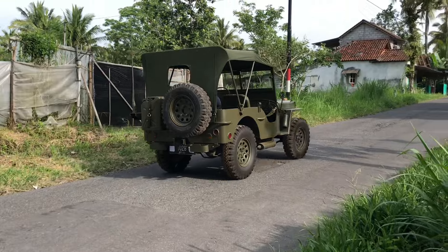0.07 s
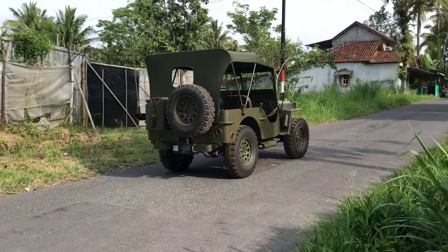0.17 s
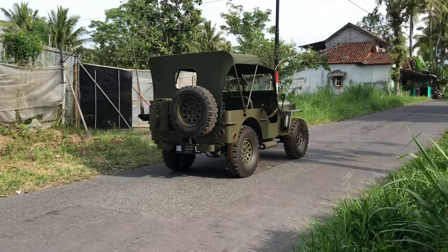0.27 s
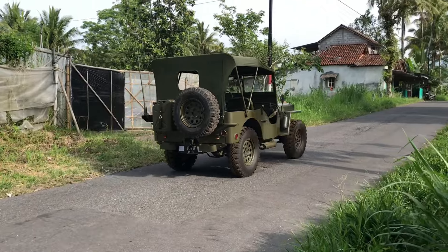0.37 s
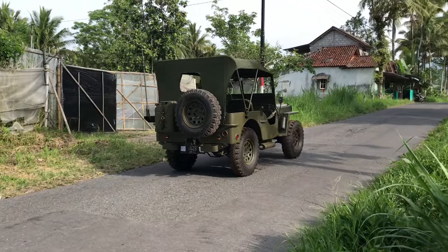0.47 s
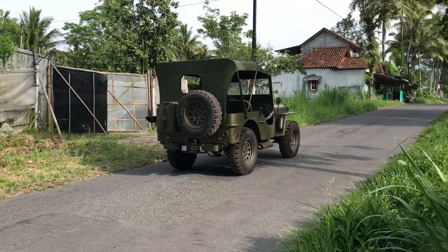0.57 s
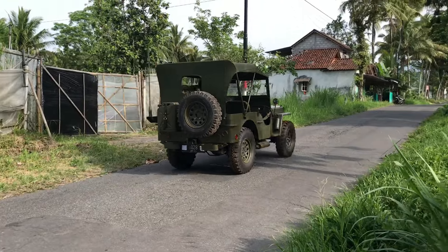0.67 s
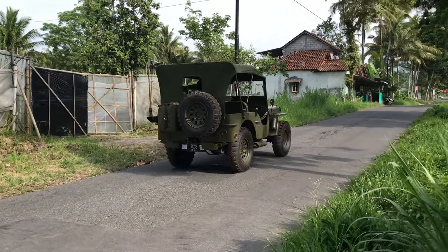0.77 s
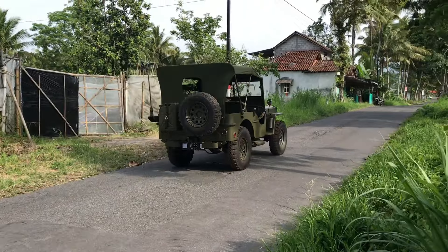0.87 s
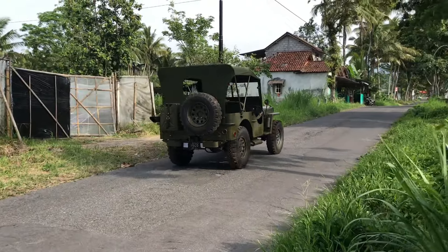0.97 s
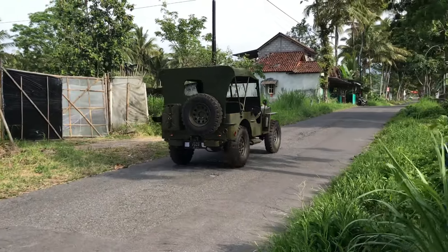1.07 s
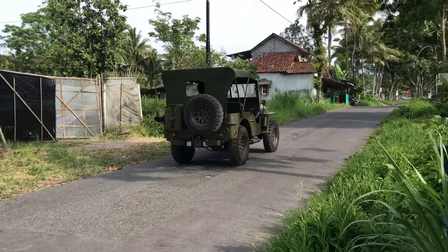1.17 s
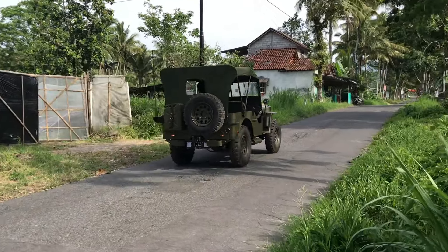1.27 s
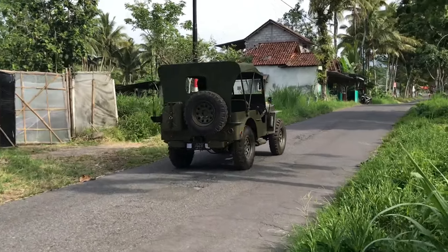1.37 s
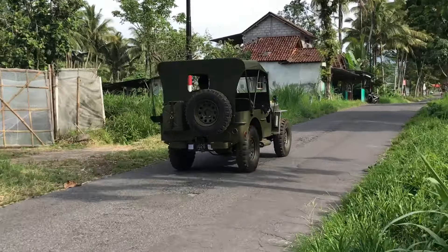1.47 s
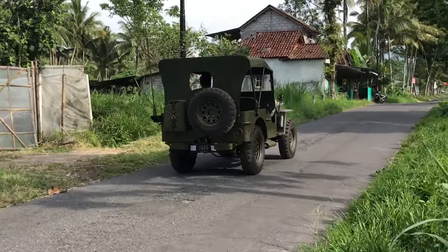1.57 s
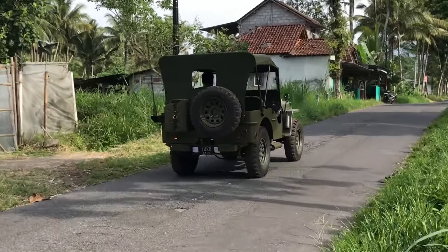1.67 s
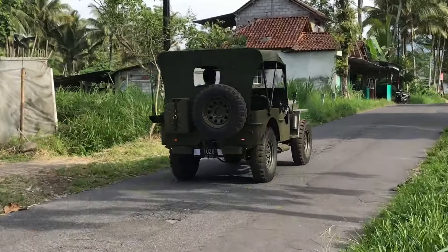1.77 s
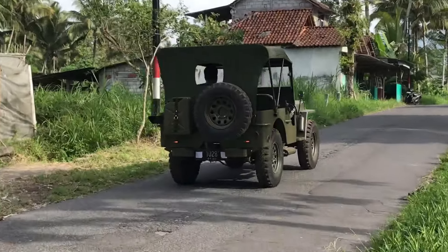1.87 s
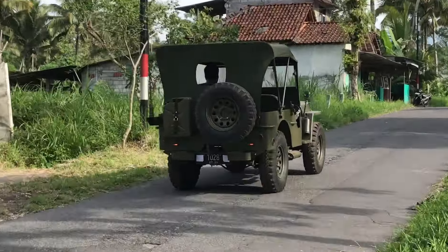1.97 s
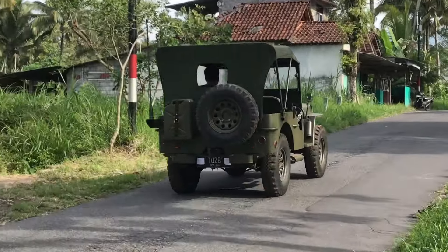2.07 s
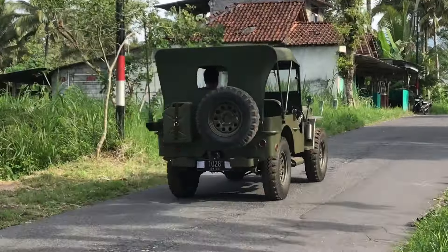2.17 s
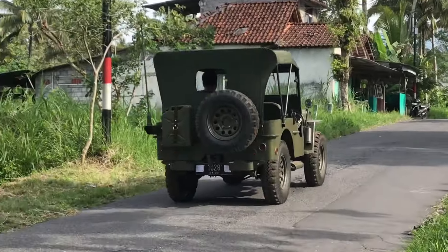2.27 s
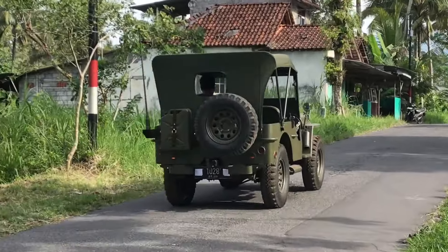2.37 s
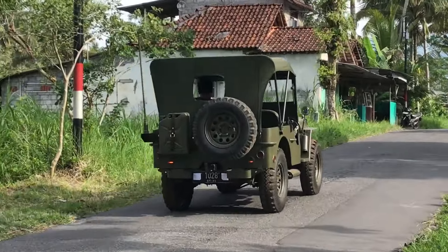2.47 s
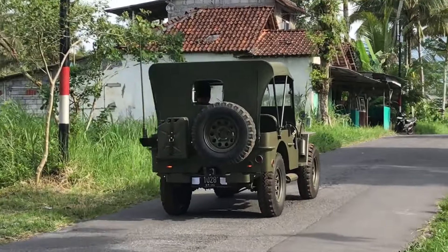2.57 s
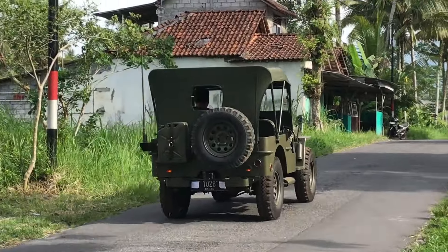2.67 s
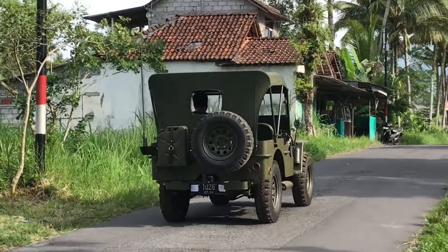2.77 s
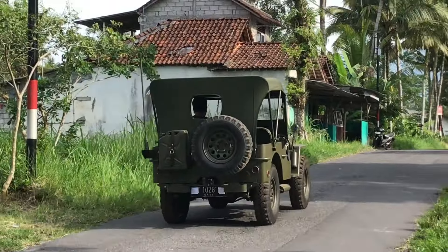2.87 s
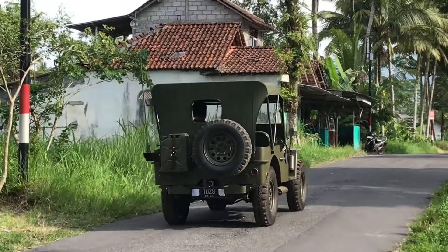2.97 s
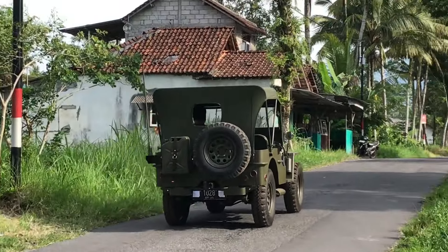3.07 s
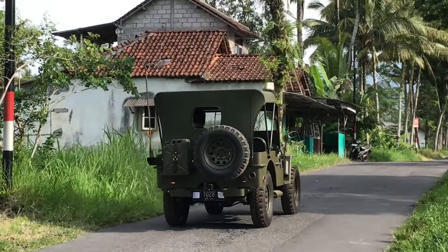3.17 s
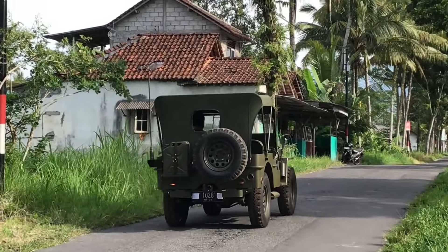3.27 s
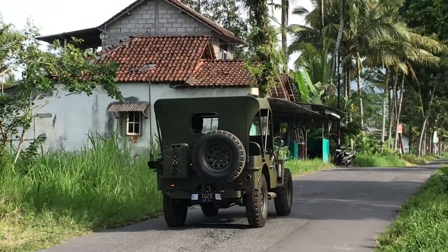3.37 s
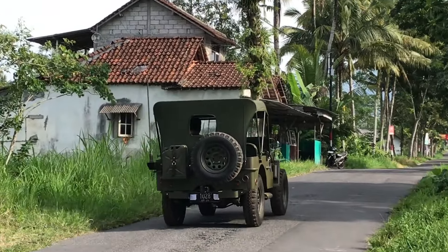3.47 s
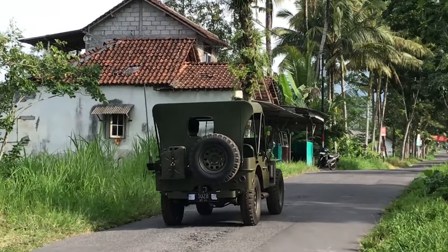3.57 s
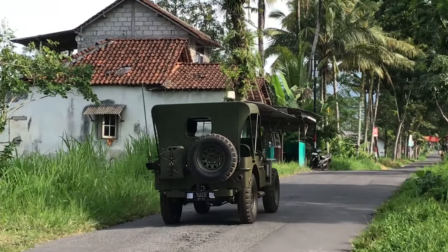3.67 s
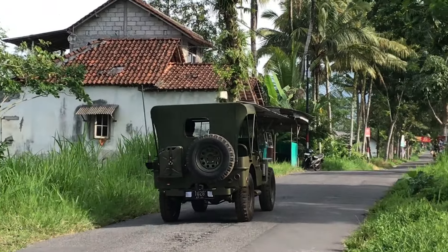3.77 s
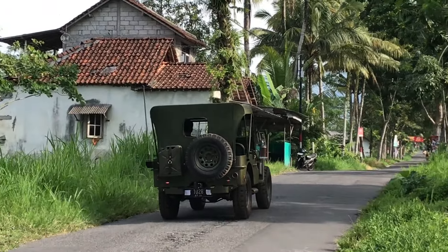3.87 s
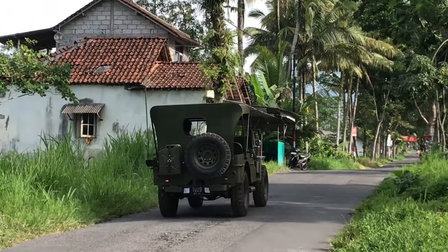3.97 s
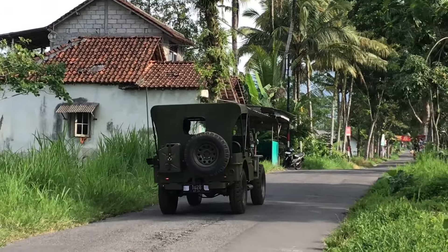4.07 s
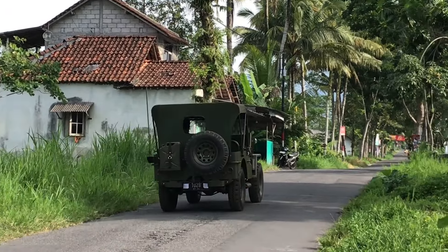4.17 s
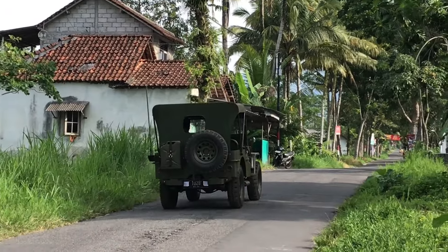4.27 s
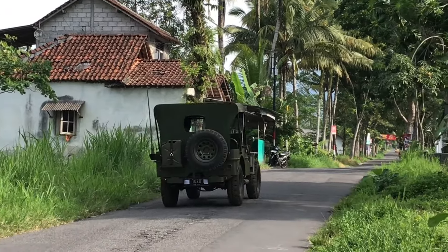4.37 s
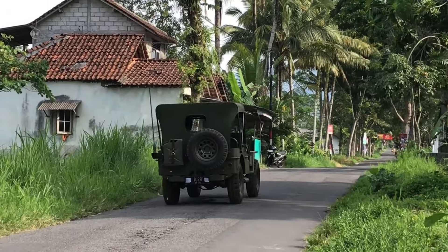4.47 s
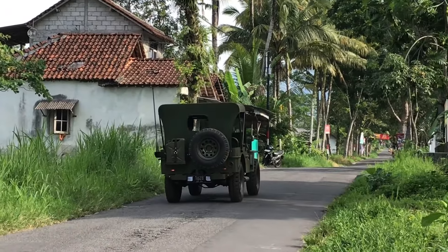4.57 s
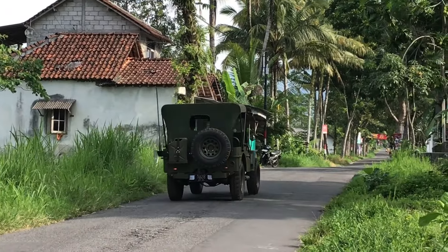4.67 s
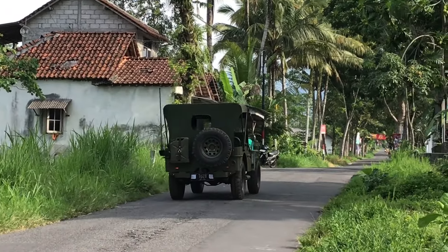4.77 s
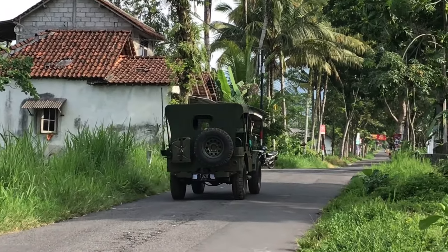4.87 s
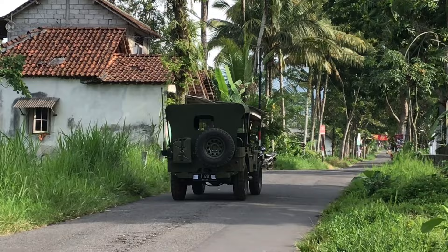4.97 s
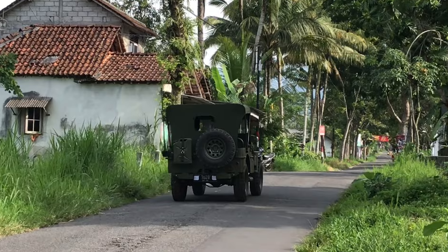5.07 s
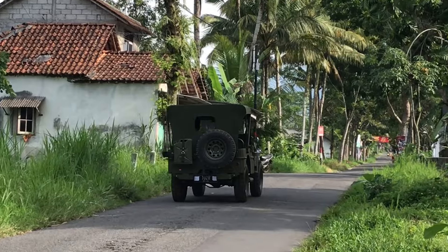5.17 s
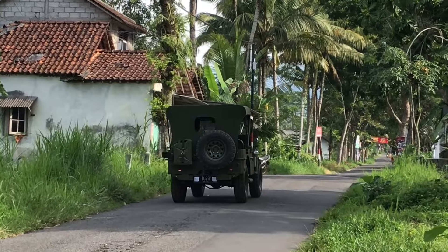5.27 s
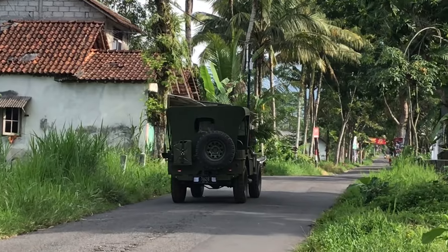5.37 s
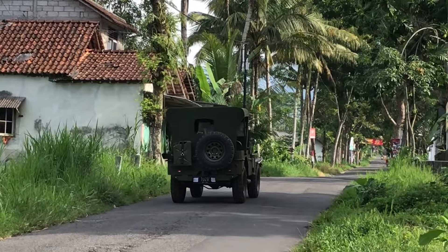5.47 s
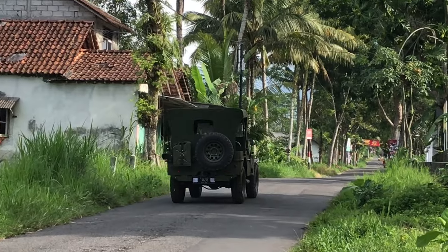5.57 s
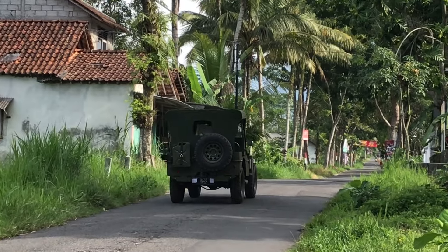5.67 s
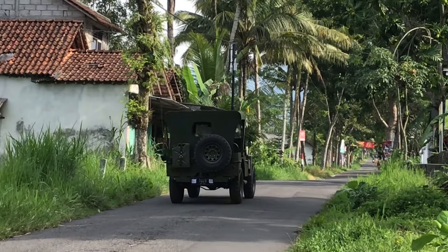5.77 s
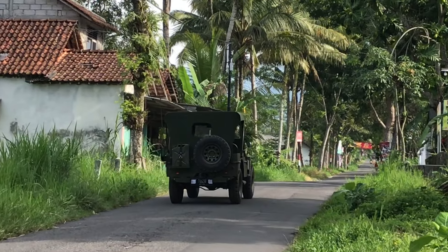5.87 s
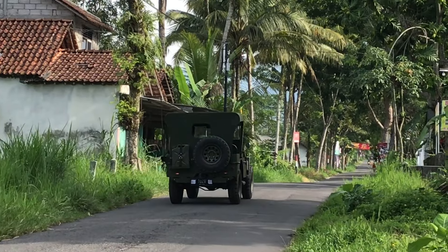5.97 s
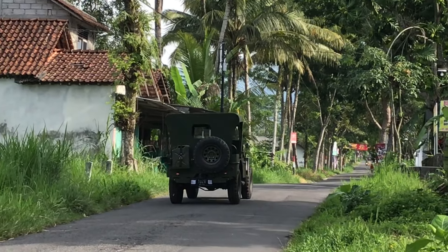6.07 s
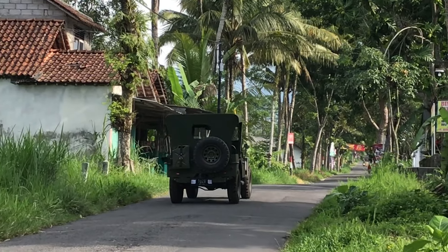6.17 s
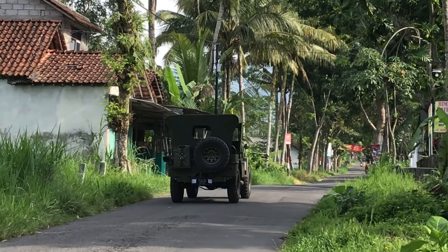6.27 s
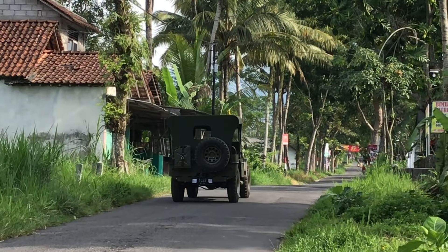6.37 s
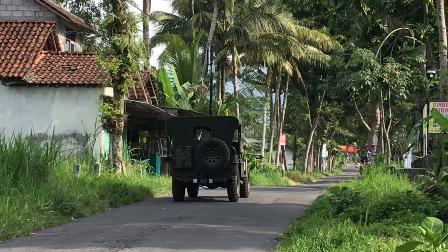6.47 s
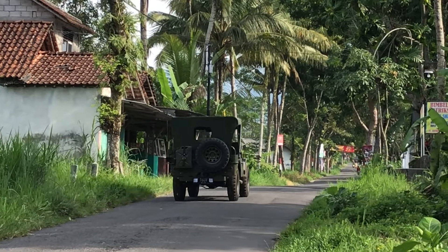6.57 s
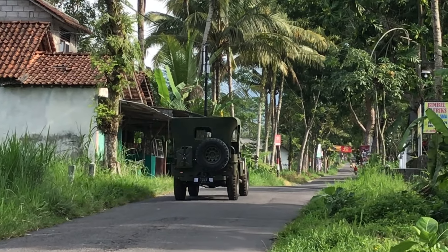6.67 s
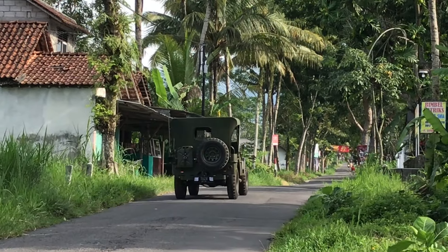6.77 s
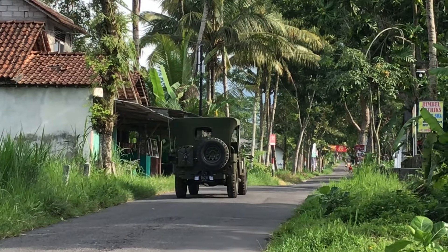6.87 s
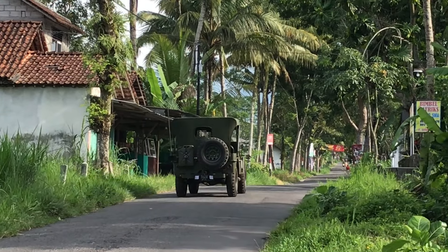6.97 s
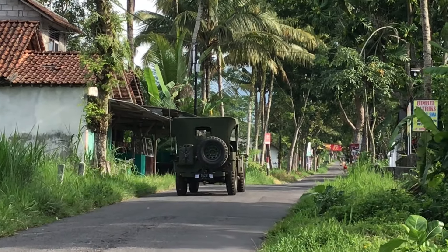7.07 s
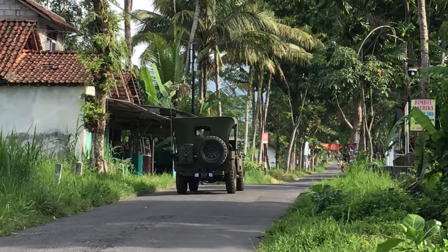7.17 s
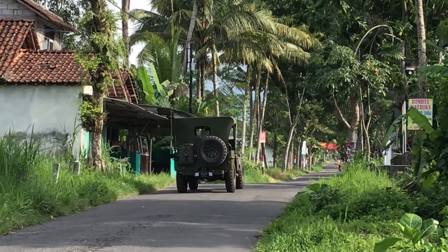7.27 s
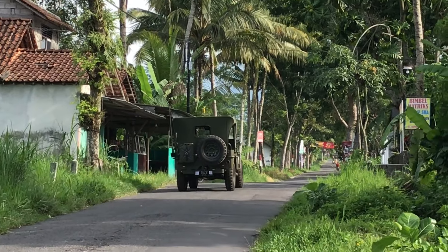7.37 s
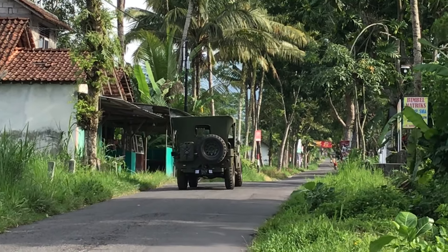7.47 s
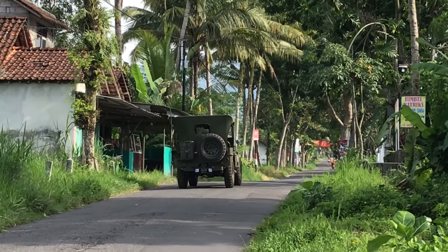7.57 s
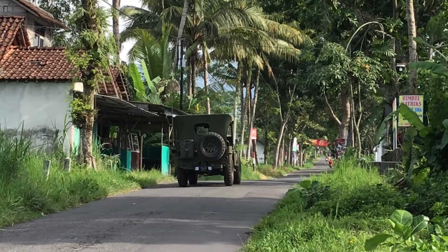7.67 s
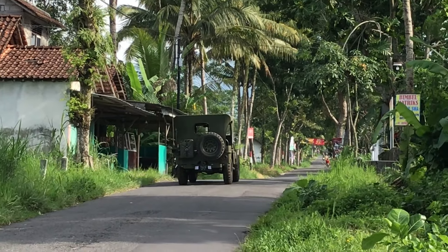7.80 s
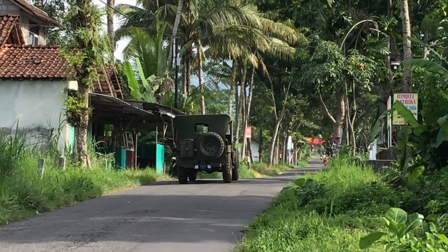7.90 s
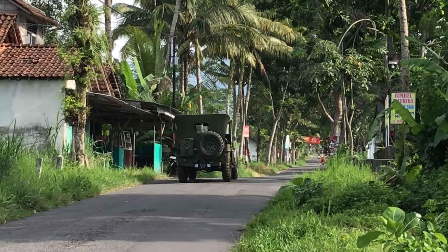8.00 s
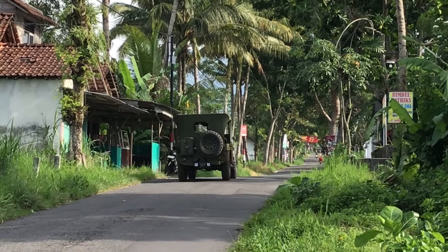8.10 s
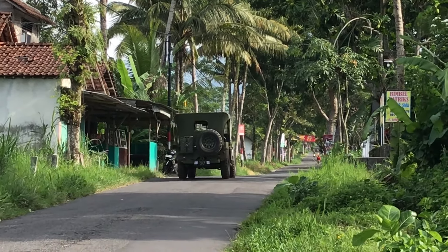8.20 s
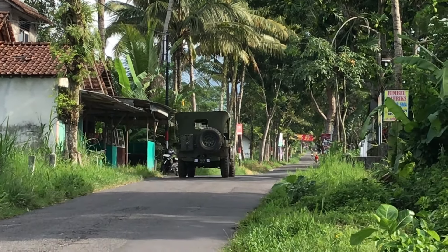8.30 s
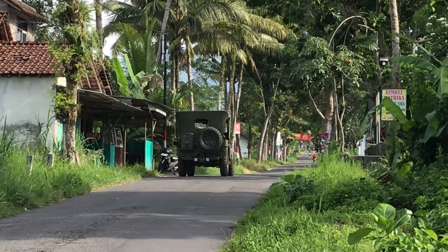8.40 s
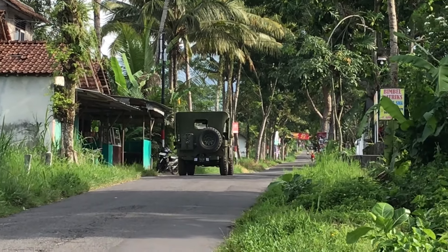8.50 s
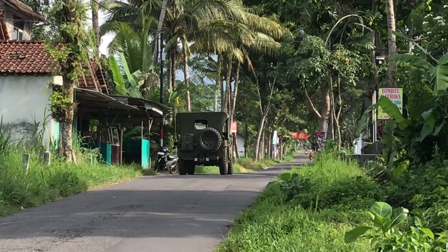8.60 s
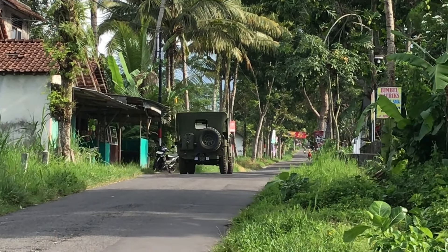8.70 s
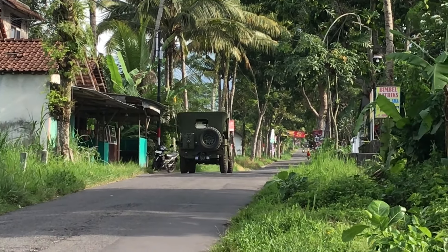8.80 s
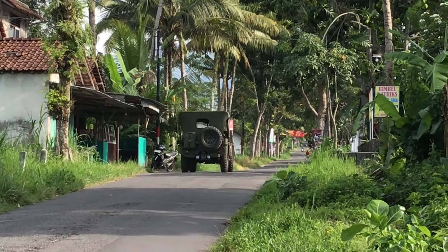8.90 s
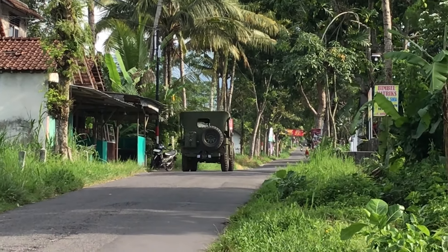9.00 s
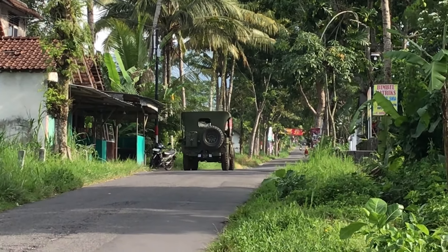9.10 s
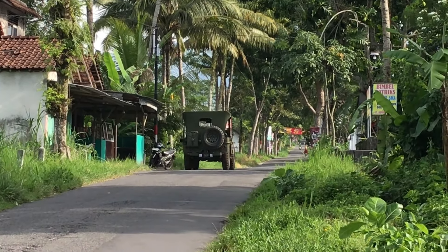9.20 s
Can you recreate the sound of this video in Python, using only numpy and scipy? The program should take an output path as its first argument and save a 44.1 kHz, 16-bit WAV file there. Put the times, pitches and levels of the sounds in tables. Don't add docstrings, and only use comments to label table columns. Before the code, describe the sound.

An old off-road car accelerates away along a village road, exhaust booming and gears whining upward, loose fittings rattling while insects buzz in the grass.

```python
import sys
import numpy as np
from scipy import signal
from scipy.fft import rfft, irfft, next_fast_len
from scipy.io import wavfile

SR = 44100
rng = np.random.default_rng(int(sys.argv[2]) if len(sys.argv) > 2 else 0)


def store_pcm(level_fs):
    pcm = np.round(np.clip(level_fs, -1, 1) * 32767).astype(np.int16)
    wavfile.write(sys.argv[1], SR, np.atleast_2d(pcm).T)


def gain_from_db(level_db):
    decades = np.asarray(level_db, float) / 20
    return 10 ** decades


N = 407474


def rms_one(x):
    return x / np.sqrt(np.mean(x ** 2) + 1e-20)


def in_time(rows):
    seconds, values = np.transpose(rows)
    return np.interp(np.arange(N) / SR, seconds, values)


def at_hz(points, hz):
    points_hz, points_db = np.transpose(points)
    return np.interp(np.log(hz), np.log(points_hz), points_db)


def drift(rate):
    r = np.exp(-80 * np.pi * rate / SR)
    white = rng.standard_normal(N // 40 + 2002)
    slow = signal.lfilter([1], [1, -2 * r, r * r], white)[2000:]
    return np.interp(np.arange(N) / 40, np.arange(len(slow)), rms_one(slow))


def resonance(x, hz, width_hz):
    r = np.exp(-np.pi * width_hz / SR)
    ring = [1, -2 * r * np.cos(2 * np.pi * hz / SR), r * r]
    return signal.lfilter(np.array([1, 0, -1]) * (1 - r * r) / 2, ring, x)


def resonant_gain(hz, peaks):
    return sum(gain_from_db(db) / (1 + (2 * (hz - centre) / width) ** 2) for centre, width, db in peaks)


def tone(turns, wander_db, rate, blur):
    level = gain_from_db(wander_db * np.tanh(drift(rate)))
    return np.sqrt(2) * level * np.cos(2 * np.pi * (turns + blur * drift(rate)))


def banded_noise(spectrum, patchy_db, rate):
    points_hz, points_db = np.transpose(spectrum)
    size = next_fast_len(N)
    hz = np.arange(size // 2 + 1) * SR / size + 1e-3
    colour = gain_from_db(np.interp(np.log(hz), np.log(points_hz), points_db, left=-150, right=-150))
    noises = irfft(rfft(rng.standard_normal((2, size))) * colour, size)[:, :N]
    octaves = np.log2(points_hz[-1] / points_hz[0])
    edges = points_hz[0] * 2 ** np.arange(0, octaves + .3, 1 / 3)
    edges = edges[edges < 21000]
    together, out = drift(rate), 0
    for k, (low, high) in enumerate(zip(edges, edges[1:])):
        sieve = signal.butter(2, [low, high], "band", fs=SR, output="sos")
        band = signal.sosfilt(sieve, noises[k % 2])
        out = out + gain_from_db(patchy_db * (0.34 * together + drift(rate))) * band
    return rms_one(out)


# (time [s], level [dB])
TAILPIPE_BOOM = [(0, -18), (.65, -14), (1.3, -11.5), (2.0, -8), (2.9, -8), (3.15, -10.5), (3.4, -7.5),
                 (4.3, -15.5), (4.7, -12.5), (5.4, -18.5), (5.85, -15.5), (6.2, -21.5), (6.5, -19.5),
                 (7.1, -22.5), (7.6, -26), (8.35, -25), (8.75, -35), (9.24, -30)]
# (pitch [Hz], level over the boom [dB])
SECOND_MULTIPLE = [(75, 12), (80, 7.5), (87, 0), (96, -4.5), (112, -10), (136, -18), (151, -28), (168, -20)]
# (pitch [Hz], level [dB])
SILENCER_SHELL = [(110, -21), (150, -24.5), (175, -28), (195, -40.5), (212, -33.5), (275, -22), (310, -20),
                  (340, -37.5)]
# (in step with the first at [firings/s], turns gained [turns/Hz])
PIPE_DELAY = [(40, 0), (43.5, .046), (35, .07), (30, .05)]


def exhaust(turns, per_s, loss_db):
    boom_db = in_time(TAILPIPE_BOOM)
    second_db = boom_db + at_hz(SECOND_MULTIPLE, 2 * per_s)
    shell_loss_db = 0.34 * loss_db
    third_db = at_hz(SILENCER_SHELL, 3 * per_s) + shell_loss_db
    fourth_db = at_hz(SILENCER_SHELL, 4 * per_s) + shell_loss_db - 10.5
    out = 0
    for k, db in enumerate([boom_db, second_db, third_db, fourth_db]):
        in_step, slope = PIPE_DELAY[k]
        slip = slope * (per_s - in_step)
        out = out + gain_from_db(db) * tone((k + 1) * turns + slip, wander_db=.5, rate=16, blur=.01)
    return gain_from_db(.6) * out


# (pitch [Hz], level [dB])
FAN_SHROUD = [(122, -37), (165, -45), (180, -33), (190, -27.5), (220, -26), (236, -31), (272, -32.5)]
# (pitch [Hz], level [dB])
FAN_OVERTONE = [(245, -52), (305, -63), (330, -43), (365, -58), (420, -44), (437, -48), (485, -50),
                (520, -45.5)]
# (pitch [Hz], level [dB])
EXHAUST_MANIFOLD = [(190, -46), (236, -41.5), (256, -30), (288, -42.5), (335, -40.5), (400, -53),
                    (510, -64)]


def fan_and_manifold(turns, per_s):
    fan = 3.235
    out = 0
    for multiple, shape, db in [(fan, FAN_SHROUD, 0), (2 * fan, FAN_OVERTONE, 0),
                                (6, EXHAUST_MANIFOLD, 0), (5, EXHAUST_MANIFOLD, -1)]:
        level_db = at_hz(shape, multiple * per_s) + db + 2.4 * drift(0.73)
        out = out + gain_from_db(level_db) * tone(multiple * turns, wander_db=1.5, rate=7.4, blur=0.036)
    return out


# (multiple of the firing rate [-], level over rumble [dB])
UNEVEN_TONES = [(.75, -31), (1.25, -16), (1.62, -18), (1.75, -18.5), (2.25, -15), (2.69, -8.5),
                (3.501, -24), (5.25, -22), (5.72, -18.5), (7, -23), (7.75, -22)]


def uneven_cylinders(turns, loss_db, rumble_db):
    weak = tone(3 / 2 * turns, wander_db=2.5, rate=4.0, blur=0.05)
    faint = sum(gain_from_db(db) * tone(m * turns, wander_db=2.0, rate=2.35, blur=0.074) for m, db in UNEVEN_TONES)
    return gain_from_db(-35 + 0.72 * loss_db) * weak + gain_from_db(rumble_db) * faint


# (multiple of the firing rate [-], pitch [Hz], width [Hz], level [dB])
CASING_MESHES = [(8.22, 450, 48, -43), (8.22, 585, 53, -42), (10.5, 774, 82, -39.5), (11.5, 540, 36, -45),
                 (11.5, 725, 47, -38), (11.5, 810, 60, -40), (16.43, 816, 120, -39.5),
                 (16.43, 930, 70, -44), (16.43, 1196, 146, -38)]
# (multiple of the firing rate [-], level over clatter [dB])
OTHER_MESHES = [(9.5, -12.5), (10, -9), (13, -15), (18, -20), (19, -17.5), (21.12, -12), (23, -11),
                (24.8, -17)]
# (pitch [Hz], width [Hz], level [dB])
BODY_PANELS = [(610, 53, -10.5), (763, 290, -5), (1194, 180, -3.5), (1269, 46, -3.5), (1493, 29, -7),
               (1645, 230, -11), (1950, 230, -11.5)]


def gears(turns, per_s, clatter_db):
    ease_start_s, ease_length_s, ease_db = 7.3, 0.47, -15
    eased = np.clip((np.arange(N) / SR - ease_start_s) / ease_length_s, 0, 1)
    load = gain_from_db(ease_db * eased)
    out = 0
    for m, *peak in CASING_MESHES:
        clean = tone(m * turns, wander_db=3.5, rate=4.0, blur=0.1)
        worn = tone(m * turns, wander_db=5.0, rate=32.0, blur=0.47)
        out = out + load * resonant_gain(m * per_s, [peak]) * (clean + gain_from_db(-1.4) * worn)
    for m, db in OTHER_MESHES:
        gain = gain_from_db(clatter_db + 3 + db) * resonant_gain(m * per_s, BODY_PANELS)
        out = out + gain * tone(m * turns, wander_db=2.5, rate=8.9, blur=0.19)
    return out


# (pitch [Hz], level per Hz [dB])
RUMBLE_COLOUR = [(15, -30), (30, -26), (50, -3), (75, -1.5), (110, -1), (170, -8), (240, -8), (330, -13),
                 (450, -24.5), (650, -43)]


def rumble(rumble_db):
    return gain_from_db(rumble_db) * banded_noise(RUMBLE_COLOUR, patchy_db=0.5, rate=1.1)


# (pitch [Hz], level per Hz [dB])
CLATTER_COLOUR = [(210, -45), (350, 0), (487, 3.5), (790, 1.5), (1010, 1.5), (1250, 0.5), (1400, 1),
                  (1950, -1), (2400, -10.5), (3120, -26), (5280, -120)]


def clatter(puff, clatter_db):
    knocks = banded_noise(CLATTER_COLOUR, patchy_db=0.92, rate=11.4)
    panels = sum(gain_from_db(db) * resonance(knocks, hz, width) for hz, width, db in BODY_PANELS)
    return gain_from_db(clatter_db + 0.72 * puff) * rms_one(knocks + 2.26 * panels)


# (pitch [Hz], level per Hz [dB])
HISS_COLOUR = [(1500, -25), (2000, -3), (2250, -4), (2600, 3), (2950, -1.5), (3300, 1.5), (4100, -1),
               (4600, -8), (5500, -9.5), (6400, -7), (7500, -9.5), (9500, -8.5), (10500, -15.5),
               (12000, -22.5)]
# (pitch [Hz], level per Hz [dB])
AIR_COLOUR = [(3300, -22), (4200, 4), (6000, 1.5), (8000, -3), (10000, -4), (11500, -2), (13000, 0),
              (13700, -4), (14300, 0), (15700, -5.5), (18000, -16)]


def escaping_gas(puff, hiss_db, air_db):
    hiss = gain_from_db(hiss_db + 0.5 * puff) * banded_noise(HISS_COLOUR, patchy_db=1.0, rate=29)
    return hiss + gain_from_db(air_db + 0.92 * puff) * banded_noise(AIR_COLOUR, patchy_db=0.9, rate=31)


# (time [s], peak level [dB], pitch [Hz])
LIGHT_KNOCKS = [(0.11, -26, 3230), (0.162, -28, 3600), (0.2094, -24, 3850), (0.2394, -22, 3940),
                (0.2897, -28, 3820), (0.4194, -24, 4040), (0.519, -21, 4050), (0.5586, -23, 4360),
                (0.605, -21, 4370), (0.6983, -22, 3400), (0.7894, -19, 4230), (1.0384, -28, 3890),
                (1.5384, -25, 3350), (1.7913, -25, 3770), (2.8784, -26, 4330), (3.263, -30, 3670)]
# (time [s], peak level [dB], pitch [Hz])
HEAVY_CLANKS = [
    (0.1142, -23, 1950),
    (1.1867, -26, 1590),
    (1.4796, -22, 1500),
    (1.7255, -20, 1710),
    (1.79, -14.5, 1900),
    (3.0006, -26, 1550),
]


def rattles(air_db):
    parts, hits_per_s = 28, 900
    sizes = gain_from_db(3.9 * np.minimum(rng.exponential(1, N), 3.0)) * rng.choice([-1, 1], N)
    struck = rng.integers(0, parts, N) + parts * (rng.random(N) > hits_per_s / SR)
    pitches = np.geomspace(1900, 7600, parts) * rng.uniform(.97, 1.03, parts)
    jingle = sum(resonance(sizes * (struck == k) + 1e-18, hz, 25.0) for k, hz in enumerate(pitches))
    out = gain_from_db(air_db * 0.32 - 34.5) * rms_one(jingle)
    t = np.arange(3000) / SR
    for s, db, hz in LIGHT_KNOCKS + HEAVY_CLANKS:
        at = round(s * SR)
        burst = rng.standard_normal(len(t)) * np.exp(-t / 0.0074)
        knock = 3.4 * resonance(burst, hz, 560) + 0.19 * np.diff(burst, prepend=0)
        out[at:at + len(t)] += gain_from_db(db - 5.5) * knock
    return out


# (start [s], end [s], start level [dB], end level [dB])
BUZZ_PHRASES = [
    (-.3, .38, -48, -48),
    (0.456, 1.2, -45, -44),
    (1.45, 2.68, -48, -45.5),
    (3.1, 3.3, -50, -45),
    (3.5, 4.18, -47, -50),
    (4.85, 5.63, -48, -44.5),
    (6.0, 6.35, -54, -56),
    (6.36, 7.2, -46, -46),
    (7.6, 8.72, -52, -46.5),
]
# (pitch [Hz], width [Hz], level [dB])
CRICKET_HUMS = [(6440, 100, -68), (7200, 80, -70), (7360, 74, -62)]


def insects():
    t, near = np.arange(N) / SR, 0
    for start, end, start_db, end_db in BUZZ_PHRASES:
        edges = np.clip(np.minimum((t - start) / 0.074, (end - t) / .025), 0, 1)
        near = near + edges * gain_from_db(np.interp(t, [start, end], [start_db, end_db]))
    far = gain_from_db(-47 + 0.86 * drift(2.0))
    out = 0
    for gain, hz, half_width_hz, damping in [(near, 8530, 210, 4.0), (far, 8330, 400, .8)]:
        strokes = np.cumsum(73 * (1 + .01 * drift(2.1))) / SR
        rasp = rng.standard_normal(N) * np.exp(-damping * (strokes % 1))
        wing = signal.butter(3, [hz - half_width_hz, hz + half_width_hz], "band", fs=SR, output="sos")
        out = out + gain * rms_one(signal.sosfilt(wing, rasp))
    white = rng.standard_normal(N)
    for hz, width, db in CRICKET_HUMS:
        out = out + gain_from_db(db + 4.1 * drift(0.55)) * rms_one(resonance(white, hz, width))
    return out


# (time [s], peak level [dB], pitch [Hz], time to fall 30 dB [s])
BIRD_CHIPS = [
    (7.918, -27, 6080, .016),
    (7.92, -32, 6250, .02),
    (7.935, -45, 6100, 0.11),
    (8.024, -40, 6100, .04),
]


def bird():
    out = np.zeros(N)
    for s, db, hz, fall_s in BIRD_CHIPS:
        t = np.maximum(np.arange(N) / SR - s, 0)
        attack = 1 - np.exp(-t / 0.0015)
        out += gain_from_db(db - 30 * t / fall_s) * attack * np.sin(2 * np.pi * hz * (t - .3 * t * t))
    return out


# (start [s], end [s], start pitch [Hz], end pitch [Hz], level [dB])
DOVE_COOS = [
    (8.062, 8.38, 753, 810, -54),
    (8.305, 8.6, 587, 597, -40),
    (8.46, 8.66, 798, 796, -43),
    (9.05, 9.3, 582, 590, -40),
]


def dove():
    out = np.zeros(N)
    for start, end, start_hz, end_hz, db in DOVE_COOS:
        part = np.clip((np.arange(N) / SR - start) / (end - start), 0, 1)
        turns = np.cumsum(start_hz + (end_hz - start_hz) * part) / SR
        swell = np.sqrt(np.sin(np.pi * part).clip(0))
        out += gain_from_db(db) * swell * tone(turns, wander_db=1.5, rate=7.9, blur=.04)
    return out


# (time [s], firing rate [firings/s])
ENGINE_SPEED = [(0.0, 37.8), (0.6, 42.3), (1.2, 47.0), (2.1, 55.4), (2.7, 60.4), (3.6, 67.1), (4.2, 70.3),
                (5.4, 75.6), (6.0, 77.3), (6.6, 78.6), (7.2, 80.4), (7.5, 81.6), (7.65, 80.8), (8.03, 83.7),
                (8.2, 80.6), (8.77, 84.4), (9.0, 82.3), (9.2, 84.3)]
# (start level [dB], share of distance loss [-], rise with speed [dB/octave])
NOISE_LEVELS = [(-26, 0.54, 1.14), (-30, 0.41, 3), (-35.5, 0.14, .5), (-37, 1.15, 5.5)]


def scene():
    per_s = in_time(ENGINE_SPEED)
    turns = np.cumsum(per_s) / SR
    roadside_m, m_per_firing = 8.0, .08
    loss_db = -10 * np.log10(1 + (turns * m_per_firing / roadside_m) ** 2)
    octaves = np.log2(per_s / per_s[0])
    rumble_db, clatter_db, hiss_db, air_db = [db + fade * loss_db + rise * octaves
                                              for db, fade, rise in NOISE_LEVELS]
    puff = np.cos(2 * np.pi * turns)
    car = exhaust(turns, per_s, loss_db) + fan_and_manifold(turns, per_s)
    car = car + uneven_cylinders(turns, loss_db, rumble_db) + gears(turns, per_s, clatter_db)
    car = car + rumble(rumble_db) + clatter(puff, clatter_db) + escaping_gas(puff, hiss_db, air_db)
    return (car + rattles(air_db) + insects() + bird() + dove())[None]


def band_limit(x):
    return signal.sosfilt(signal.butter(12, 15730, fs=SR, output="sos"), x)


# (pitch [Hz], width [Hz], share removed [0-1])
MICROPHONE_DIPS = [(4900, 280, 0.42), (7740, 200, 0.56), (10450, 630, 0.6)]


def record(dry):
    x = dry
    for hz, width, share in MICROPHONE_DIPS:
        x = x - share * resonance(x, hz, width)
    top_cut = signal.ellip(10, .5, 70, 15930, fs=SR, output="sos")
    mix = np.clip(signal.sosfilt(top_cut, x), -1, 1)
    return band_limit(mix)


dry = scene()
out = record(dry)
store_pcm(out)
```